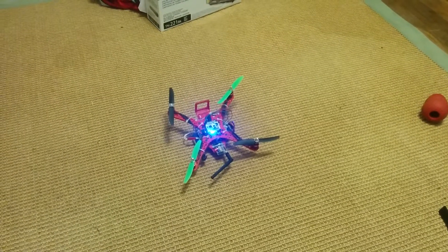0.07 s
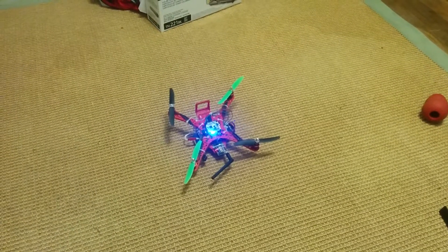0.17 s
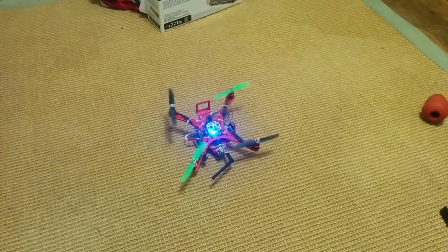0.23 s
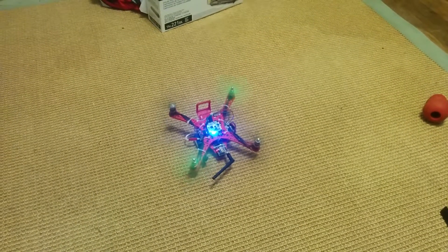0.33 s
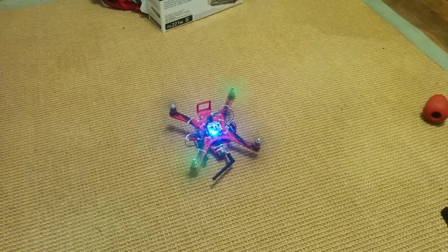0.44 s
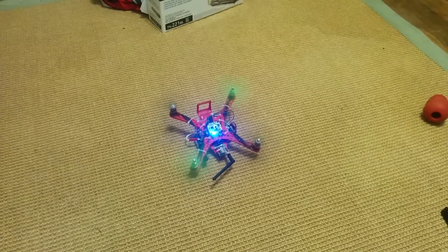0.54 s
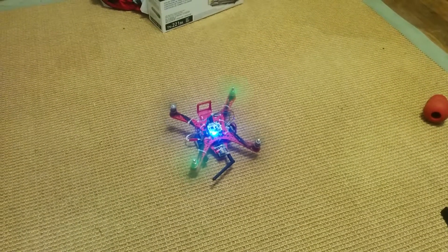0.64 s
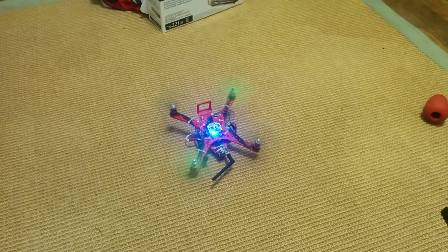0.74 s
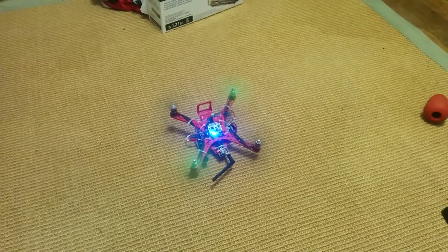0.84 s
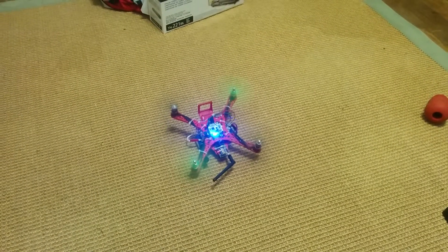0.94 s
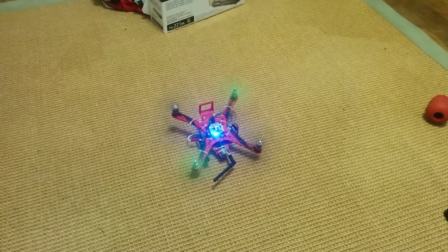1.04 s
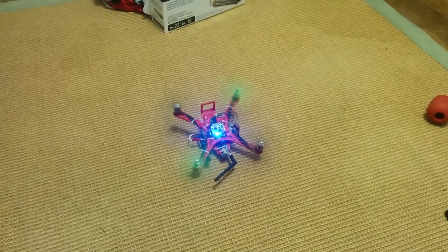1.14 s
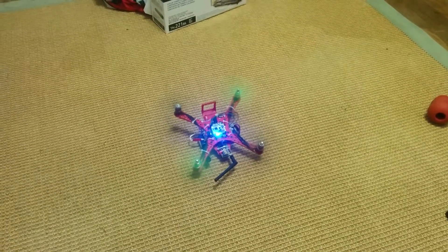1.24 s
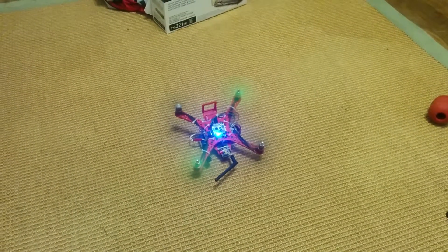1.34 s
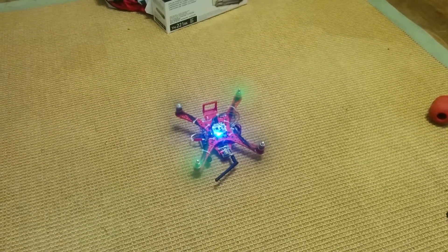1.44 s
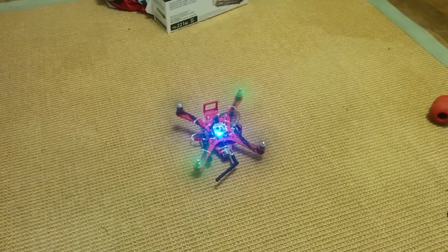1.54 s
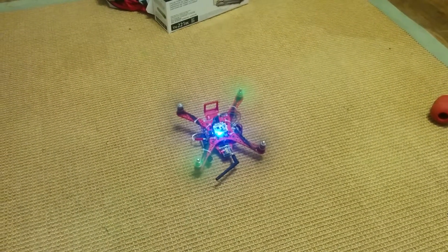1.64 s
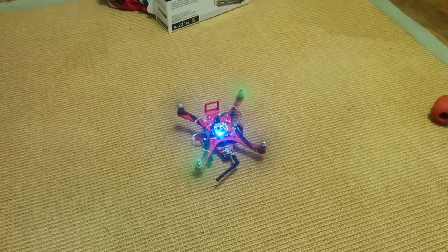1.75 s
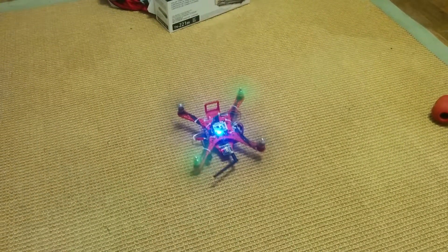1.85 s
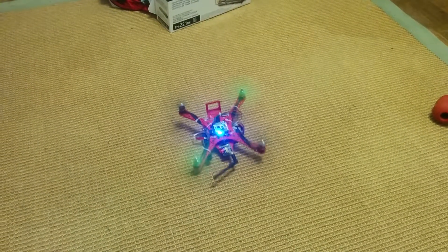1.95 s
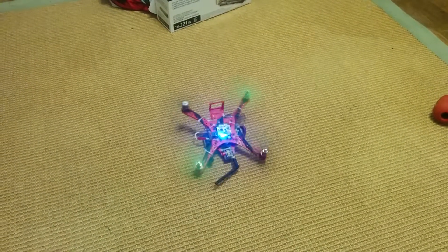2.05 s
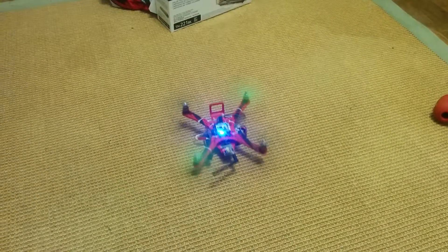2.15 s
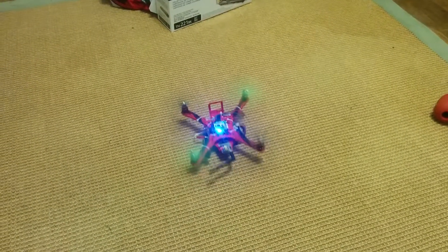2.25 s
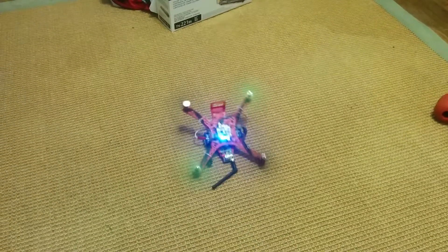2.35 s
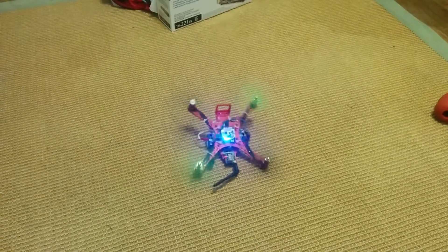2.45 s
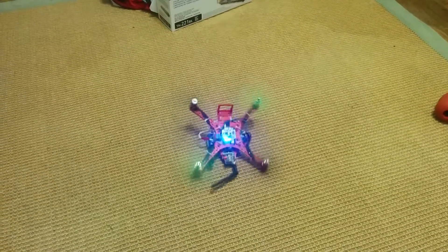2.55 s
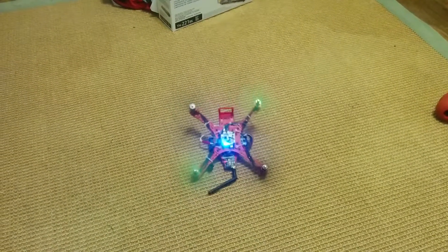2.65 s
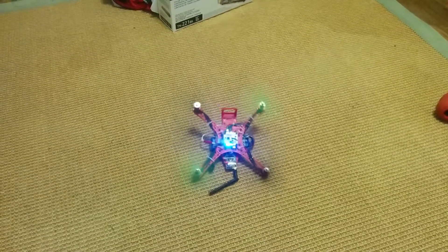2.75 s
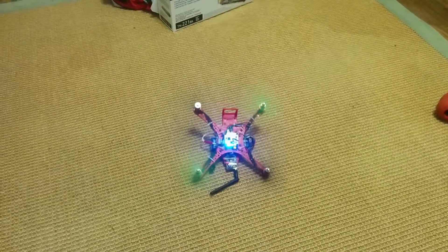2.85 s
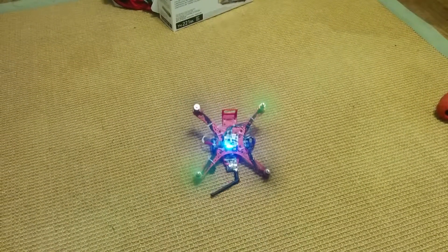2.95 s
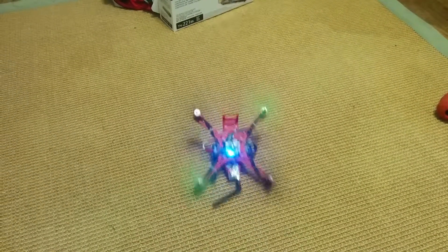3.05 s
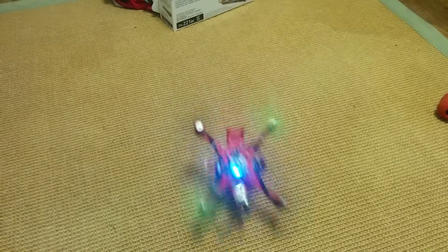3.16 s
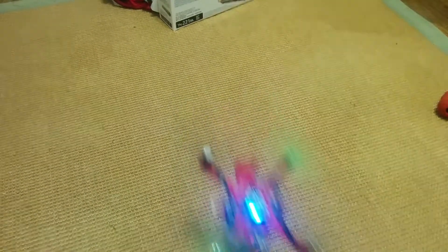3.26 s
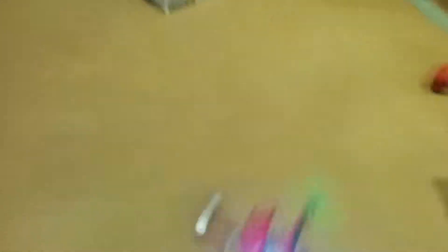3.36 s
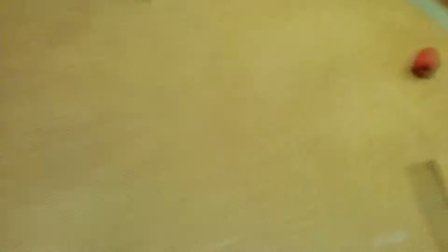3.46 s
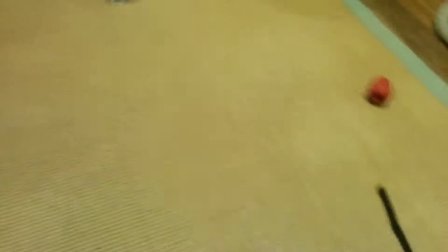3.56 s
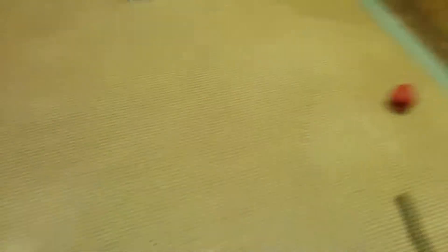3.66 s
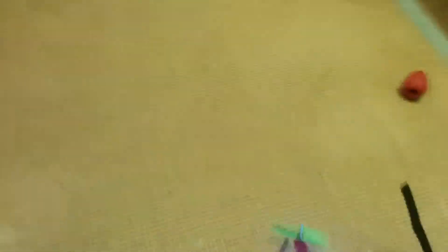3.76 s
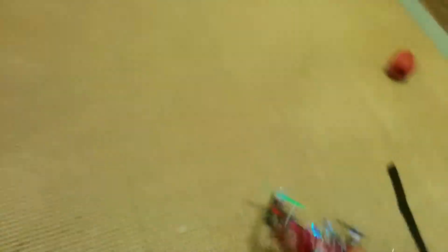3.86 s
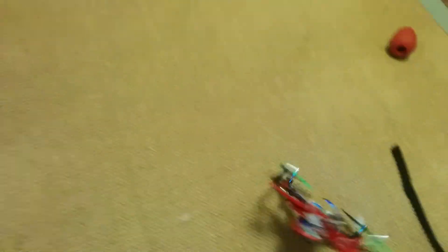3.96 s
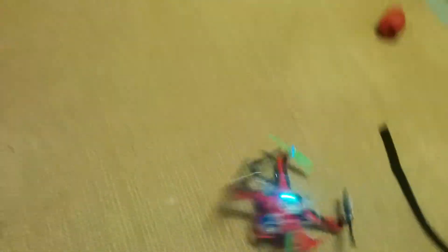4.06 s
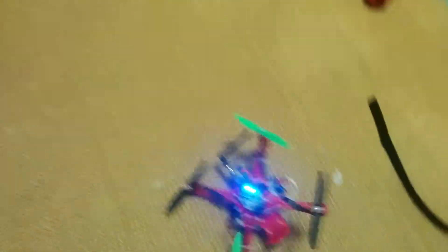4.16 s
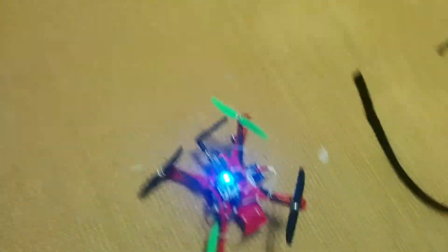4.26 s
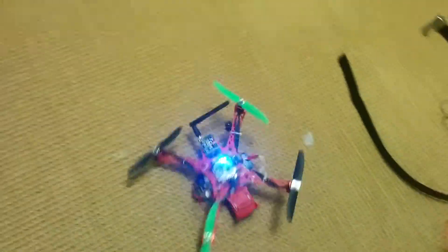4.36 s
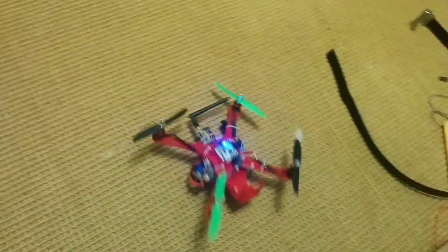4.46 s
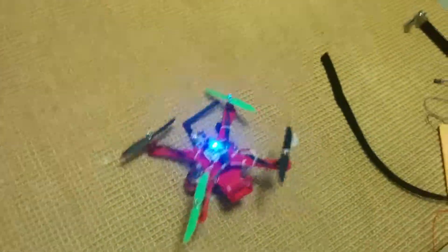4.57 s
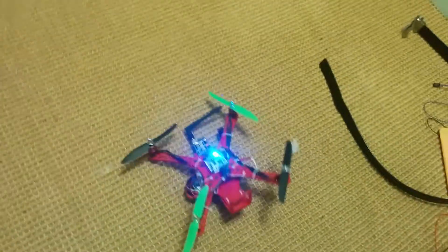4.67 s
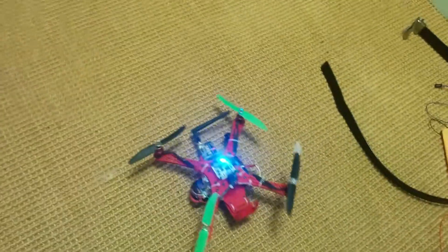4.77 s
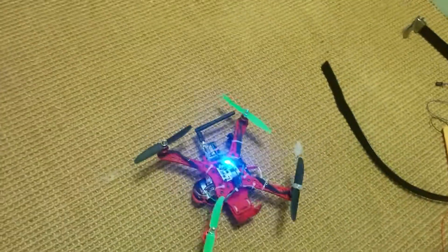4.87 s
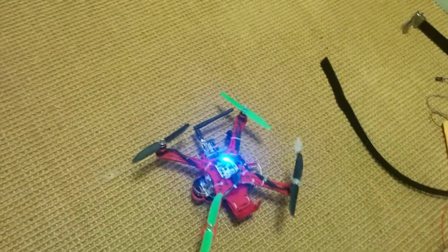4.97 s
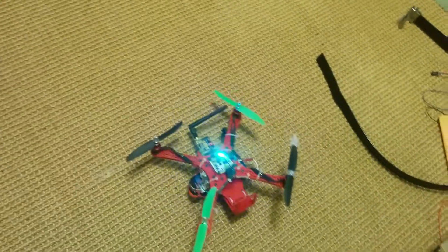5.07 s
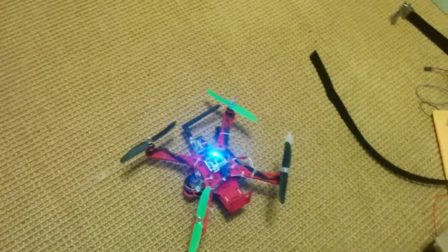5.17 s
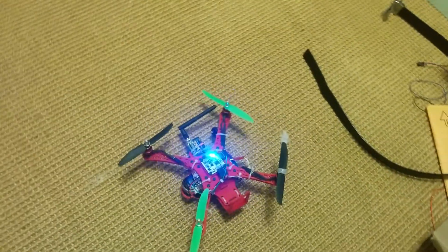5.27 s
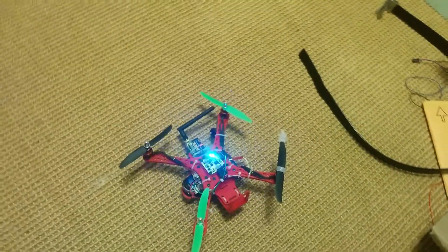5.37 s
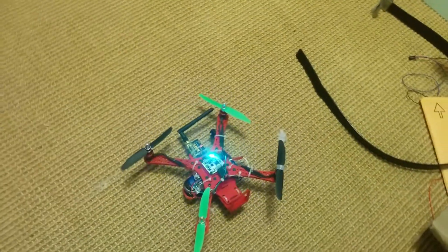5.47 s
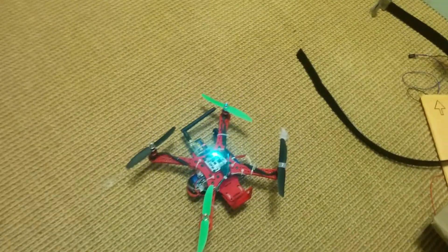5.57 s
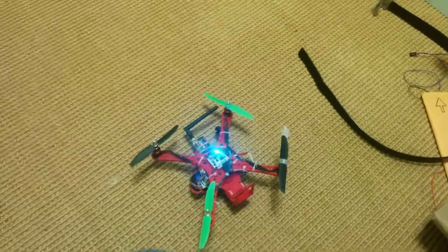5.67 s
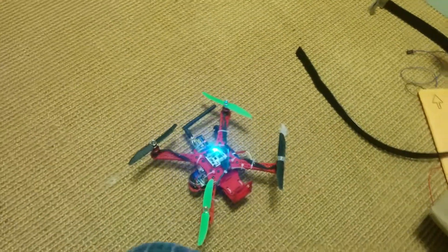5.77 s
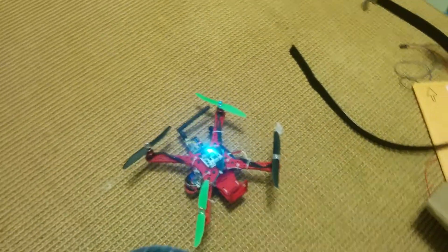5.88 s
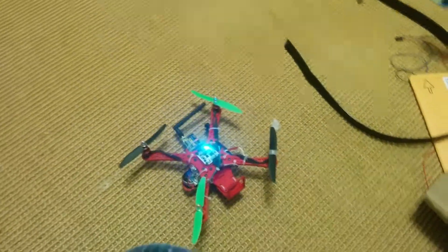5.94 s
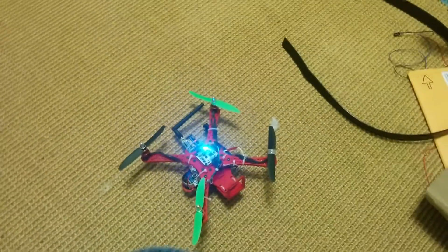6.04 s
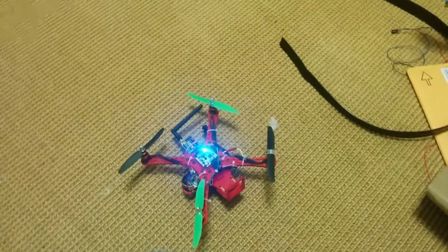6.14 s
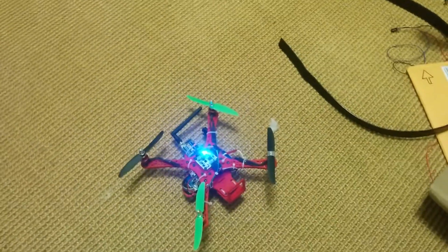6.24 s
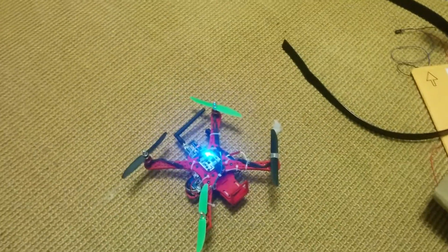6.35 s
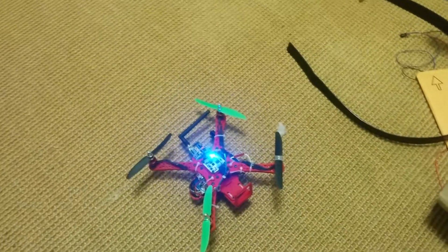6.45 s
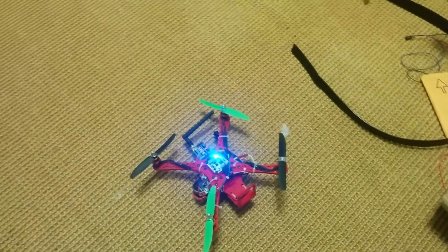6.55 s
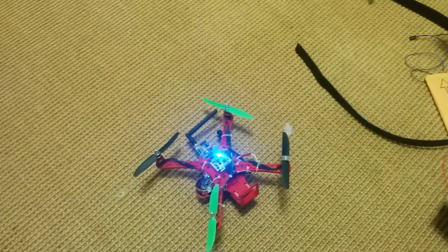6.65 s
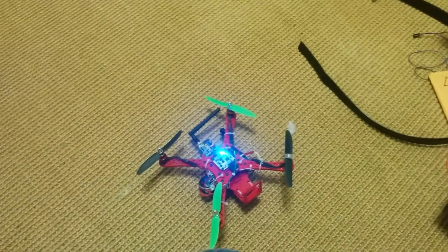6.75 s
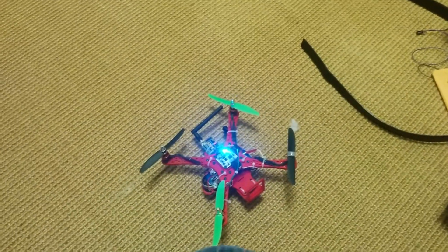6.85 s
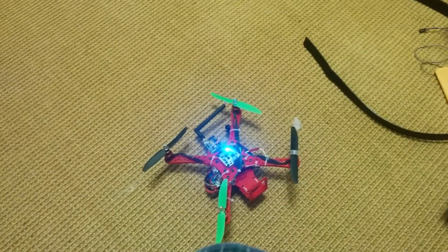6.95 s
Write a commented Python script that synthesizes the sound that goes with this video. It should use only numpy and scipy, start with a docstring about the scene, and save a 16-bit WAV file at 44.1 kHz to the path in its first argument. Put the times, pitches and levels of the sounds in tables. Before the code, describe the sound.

After a moment of very quiet room tone, drone motors kick in with a piercing beating whine. Four propellers flutter and rush, wavering in pitch, then surge loudly for an instant. Hard plastic strikes and scraping blades follow, with bumps of the frame on carpet thinning to a last soft rattle. Near-silence with faint rustling ends it. Small dull room, mono, a metre or two away.

```python
"""Quadcopter hop and crash

A small quadcopter arms on a carpet: controller tones whistle and beat while four propellers spin up.
It hops, lands on its blades, which rattle to a stop, then tumbles over and settles.
Rotors are blade-pass harmonics plus shaped noise; impacts are decaying noise bursts and modes.
A faint room hum and a late rustle remain. One microphone, a metre or two away.
"""
import sys
import numpy as np
from scipy import signal
from scipy.fft import rfft, irfft, next_fast_len
from scipy.io import wavfile
from scipy.ndimage import uniform_filter1d

SR = 44100
rng = np.random.default_rng(int(sys.argv[2]) if len(sys.argv) > 2 else 0)


def int16_out(signal):
    """Quantize to a 16-bit WAV file."""
    q = np.round(np.clip(np.atleast_2d(signal).T, -1, 1) * 32767)
    wavfile.write(sys.argv[1], SR, q.astype(np.int16))


N = 309141
T = np.arange(N) / SR

# rotor speed: (time [s], blade passes of pair A [Hz], of pair B [Hz], blade tones re wake [dB])
ROTOR_SPEED = [(.42, 32, 28, -24), (.6, 70, 85, -12), (.9, 104, 120.4, -7), (1.1, 124, 133.5, -4.5),
               (1.3, 112, 124.4, -7.5), (1.57, 134, 149, -5.5), (1.7, 112, 134, -6.5),
               (1.89, 138, 158.5, -0.5), (2.0, 126, 150, -3.5), (2.24, 147, 166, -4),
               (2.32, 126, 157, -4.5), (2.42, 160, 173, 1.5), (2.51, 117, 157, -0.5), (2.62, 122, 136, -6),
               (2.73, 151, 180, 2.5), (2.82, 123, 156, -1.5), (2.9, 102, 140, -3), (3.0, 92, 118, 3),
               (3.1, 147, 161, 3), (3.19, 196, 220, 2.5), (3.26, 225, 256, 15.5), (3.32, 247, 273, 12),
               (3.37, 205, 244, 4), (3.43, 170, 225, 4), (3.5, 132, 188, 1.5)]
# load on the propellers: (time [s], relative wake level [dB])
LOAD = [(.35, -82), (.495, -45), (.61, -46), (.75, -36.5), (1.13, -27.5), (1.26, -29), (1.5, -28),
        (1.6, -24), (1.72, -34), (1.87, -20.5), (2.02, -28), (2.08, -24.5), (2.15, -32), (2.24, -26),
        (2.32, -33.5), (2.4, -26), (2.48, -33), (2.53, -31.5), (2.64, -42), (2.72, -25.5), (2.82, -27),
        (2.91, -46), (3.02, -50), (3.14, -19.5), (3.26, -18.5), (3.37, -19.5), (3.49, -38), (3.6, -34)]
# noise re load: (time [s], vortex rush [dB], blade edges [dB], blade tips [dB])
HISS_OFFSETS = [(.5, -30, 6.5, 0.5), (.64, -10, 2, -6), (1.12, -4, 2.5, 0), (1.6, -6.5, 2, -1.5),
                (1.85, -7.5, -1, -2), (2.05, -4.5, -6.5, -4), (2.25, -5, -8, 0.5), (2.4, -5.5, -10, -3),
                (2.53, -4.5, -14, 0.5), (2.72, -3.5, -7.5, 3), (2.82, -8, -13, -3.5),
                (2.92, -3.5, -10, 3.5), (3.18, -1, 4, 3.5), (3.35, -1.5, 4, 1.5), (3.43, 0, -10, 2)]
# throttle chops: (time [s], half length [s], tip hiss and idle tone change [dB])
THROTTLE_CHOPS = [(1.694, .03, -10.5), (2.992, .022, -7)]
# blade-pass harmonics: (multiple [1], relative level [dB])
BLADE_HARMONICS = [(1, -9), (2, 2), (3, -8), (4, -1.5), (5, -8), (6, -7), (7, -9), (8, -6), (9, -11),
                   (10, -11)]
# blade-tone radiation by frame and floor: (frequency [Hz], relative level [dB])
RADIATION_SPECTRUM = [(70, -30), (150, -15), (230, -3), (300, -1.5), (380, -4), (450, 0.5), (520, 2.5),
                      (600, 1), (750, 0), (900, 2), (1050, 3), (1250, 1), (1700, -2), (2500, -8),
                      (3200, -25)]
# noise spectra of wake, vortex rush, blade edges, blade tips: (frequency [Hz], relative density [dB])
WAKE_SPECTRUM = [(24, -54.5), (40, -35), (70, -28.5), (140, -17), (190, -13.5), (260, -7.5), (340, -13.5),
                 (410, -16.5), (530, -5), (750, -3.5), (1060, 1.5), (1500, -2.5), (2100, -6), (3000, -31)]
RUSH_SPECTRUM = [(1500, -26.5), (2200, -6.5), (2800, -1), (3800, 1.5), (4300, -5.5), (5300, -26.5)]
EDGE_SPECTRUM = [(3300, -17), (4400, 0), (5300, -1), (6200, -3.5), (7300, -7.5), (9000, -27)]
TIP_SPECTRUM = [(5500, -24.5), (7300, -1.5), (8700, -0.5), (10500, -6), (12500, -10.5), (14500, -21),
                (16000, -31.5)]
# standing resonances in the wake: (frequency [Hz], width [Hz], gain [dB])
WAKE_RESONANCES = [(515, 22, -0.5), (695.8, 22, -4), (815, 22, -3), (1037, 28, 1), (1110, 25, -6),
                   (1195, 11, -3.5), (1480, 30, -2.5), (1656, 22, -0.5)]
# controller switching tone: (time [s], frequency [Hz])
SWITCHING = [(.34, 8056), (2.4, 8049), (3.15, 8049), (3.3, 8075), (3.44, 8085), (3.54, 8010)]
# whistle spells of even beats: (start [s], length [s], beats [1], relative level [dB])
WHISTLE_SPELLS = [(0.346, 0.018, 1, -47), (0.372, 0.017, 1, -36), (0.404, 0.028, 2, -39),
                  (0.428, 0.15, 2, -26.5), (.582, 0.09, 1, -23.5), (0.671, .1, 1, -23),
                  (0.774, 0.074, 1, -27), (0.854, 0.086, 1, -23), (0.942, 0.1, 1, -21.5),
                  (1.037, .075, 1, -22.5), (1.117, .145, 2, -24.5), (1.262, .12, 1, -22.5),
                  (1.389, 0.12, 1, -22.5), (1.504, 0.045, 1, -23.5), (1.548, 0.077, 1, -22),
                  (1.731, 0.1, 1, -20.5), (1.833, 0.051, 1, -20.5), (1.885, .08, 1, -36.5),
                  (1.971, 0.083, 2, -25), (2.048, 0.055, 1, -24.5), (2.127, 0.12, 1, -24.5),
                  (2.248, 0.053, 1, -26), (2.305, 0.12, 3, -21.5), (2.435, 0.096, 1, -21.5),
                  (2.609, 0.15, 2, -24.5), (2.841, 0.085, 1, -25.5), (2.944, 0.054, 1, -34.5),
                  (3.023, 0.16, 2, -21.5), (3.2, .25, 3, -32), (3.451, 0.11, 2, -25.5)]
# commutation tones: (time [s], relative level [dB])
COMMUTATION_LEVEL = [(.43, -46), (.47, -28), (.56, -49.5), (.65, -35.5), (.75, -44), (1.0, -52),
                     (1.15, -72)]
# motor run-ups: (start [s], lag [s], top commutation rate [Hz], relative level [dB])
MOTOR_RUN_UPS = [(.418, 0.3, 4140, -2), (.44, .06, 1150, -7), (.452, 0.11, 4250, -18)]
# motor squeals: (time [s], half length [s], frequency [Hz], level [dB])
MOTOR_SQUEALS = [(0.541, 0.024, 6700, -31.5), (1.162, 0.014, 5080, -22.5), (1.849, 0.017, 5234, -21),
                 (2.174, 0.015, 5410, -28), (2.23, 0.016, 4009, -29), (2.398, 0.054, 2750, -33.5),
                 (2.514, 0.02, 5430, -32.5), (2.729, 0.029, 5490, -32)]
# starting-kick sidebands: (time [s], lower sideband level [dB])
KICK_LEVEL = [(.338, -61), (.346, -68), (.353, -74), (.37, -66), (.38, -45), (.392, -62), (.41, -53),
              (.46, -44), (.55, -37.5), (.7, -40), (.9, -58), (1.0, -90)]
# arm resonances shaken at start: (time [s], half length [s], frequency [Hz], level [dB])
ARM_SHAKES = [(0.544, 0.059, 1513, -42.5), (0.557, 0.059, 1673, -48.5), (0.546, 0.071, 1017, -60)]
# blades and frame striking: (time [s], relative level [dB], tilt [dB/octave], t60 [s])
BLADE_CLACKS = [(3.459, -18.5, -6.5, 0.04), (3.528, -29.5, 8.5, 0.17), (3.609, -4.5, 3, 0.042),
                (3.614, -14.5, -1.5, 0.14), (3.626, -11.5, 5, 0.058), (3.651, -14.5, 5.5, 0.023),
                (3.668, -15, 1, 0.021), (3.689, -30, 5, 0.028), (3.802, -36, 10.5, 0.018),
                (3.827, -42, -9, .03), (3.855, -59, 20, .02), (3.92, -32, -5, 0.092),
                (3.950, -31.5, 13, 0.023), (3.981, -39, -11, .025), (4.037, -25.5, -8, 0.025),
                (4.062, -42.5, -13.5, 0.019), (4.077, -37, -10, .025), (4.156, -35, -2, 0.042),
                (4.194, -44, -7.5, .067), (4.257, -33.5, 1.5, 0.045), (4.261, -28, 3.5, 0.023),
                (4.196, -59, 3, .04), (4.323, -48.5, 0, .05), (4.349, -63, 6, .025), (4.686, -69, 2, 0.032),
                (5.416, -61, -11.5, 0.055), (5.774, -70, -9.5, .06)]
# blades dragging over carpet:
# (time [s], length [s], relative level [dB], tilt [dB/octave], slowing t60 [s], rasp near 2 kHz [dB])
BLADE_SCRAPES = [(3.607, 0.077, -26, -2, 0.24, 0), (3.636, 0.094, -25, 3, 0.32, -2),
                 (3.802, 0.092, -38, 0.5, 0.64, -11), (3.918, 0.049, -33, -1.5, 0.37, -10.5),
                 (3.963, 0.13, -48.5, 7, 0.32, -7), (4.039, 0.047, -40.5, 5.5, 0.25, 5),
                 (4.159, 0.054, -53.5, -5, 0.63, -1), (4.252, .08, -57, 3, 0.23, 0.5),
                 (4.545, .04, -54.5, -12.5, .095, 1)]
# body on floor: (time [s], relative level [dB], relative arm ring [dB], body pitch [Hz], body t60 [s])
BODY_THUMPS = [(3.631, -15.5, -23, 177, 0.23), (3.651, -15, -15, 192, 0.15), (3.804, -39, 5, 150, 0.21),
               (3.861, -5, -10, 231, 0.071), (3.889, -14.5, -9, 214, 0.13), (3.916, -2, -2.5, 260, .085),
               (3.942, -8, -8.5, 222.5, 0.14), (3.976, -11.5, -2, 228.5, 0.15),
               (4.035, -15, -8, 266, 0.086), (4.079, -23, -20, 303, .12), (4.159, -27, -19, 220, 0.04),
               (4.185, -26, -10, 257, 0.12), (4.252, -19.5, -7, 227, 0.18),
               (4.324, -17.5, -21, 196.5, 0.12), (4.398, -35, -27, 170, 0.092), (4.56, -19, 1.5, 223, .07),
               (4.584, -24.5, 6.5, 215, 0.083), (4.62, -31, -13, 205, .075), (4.731, -35, -29, 196, .07),
               (5.87, -43, -25.5, 220, .095)]
# single parts ringing: (time [s], relative level [dB], frequency [Hz], t60 [s])
PART_RINGS = [(3.461, -9.5, 542.4, 0.039), (3.46, -16, 3040, 0.033), (3.46, -13, 4300, 0.037),
              (3.525, -7, 1017, 0.06), (3.529, -29, 1620, 0.33), (3.636, -17.5, 2780, 0.19),
              (3.636, -12.5, 3940, 0.16), (3.895, -28.5, 3950, 0.064), (3.95, -14, 9160, 0.19),
              (4.038, -26.5, 2290, 0.15), (4.038, -16, 3680, 0.028), (4.041, -33, 1560, 0.16),
              (4.157, -26, 3700, 0.037), (4.197, -9.5, 910, 0.013), (4.227, -32, 3360, 0.021),
              (4.259, -18, 4520, 0.043), (4.258, -13, 2870, 0.021), (4.26, -40, 643, 0.31),
              (4.323, -31, 4140, 0.047), (4.565, -33, 676, 0.096), (4.638, -64, 1550, 0.17),
              (4.717, -53.5, 1050, 0.052), (4.763, -52, 4590, 0.044), (5.345, -60, 3450, 0.16),
              (5.774, -62.5, 2050, .05)]
# plastic contact bands: (low [Hz], high [Hz], level in a clack [dB], level in a scrape [dB])
PLASTIC_BANDS = [(499, 1500, -7.5, -2), (1680, 3000, -5, 2), (3330, 6100, 6, -7.5), (6890, 11100, 1.5, 4),
                 (12000, 17000, -22.5, -20.5)]
# body modes: (ratio to body pitch [1], relative level [dB], share of body t60 [1])
BODY_MODES = [(.32, -27, 1.2), (.457, -9.5, 1.7), (.71, -14.5, 1.8), (.876, -4.5, 1.3), (1, 2.5, 1),
              (1.23, -4, 1), (1.56, -12.5, .9)]
# arm modes: (frequency [Hz], relative level [dB], t60 [s])
ARM_MODES = [(448, 1, 0.055), (536, -2.5, .1), (575, 0.5, 0.1), (633, -3, 0.11)]
# frame ticks: (time [s], level [dB])
FRAME_TICKS = [(4.551, -39.5), (4.562, -33), (4.568, -36), (4.576, -34), (4.585, -36.5), (4.594, -39.5),
               (4.608, -52.5)]
# frame tick spectrum: (frequency [Hz], relative density [dB])
FRAME_SPECTRUM = [(400, -14.5), (700, 1.5), (1200, -5), (1700, -3.5), (2200, -9.5), (2750, -2.5),
                  (3300, -6.5), (3950, 6.5), (4600, -11.5), (5700, -13), (7000, -27.5), (10000, -47)]
# rubbed frame resonances: (frequency [Hz], relative level [dB])
RUBBED_MODES = [(980, -5), (1550, -5), (2050, -6), (2900, -9)]
# handling rustle bands: (low [Hz], high [Hz], relative level [dB])
RUSTLE_BANDS = [(189, 286, -0.5), (600, 1170, -7), (1698, 2700, -15.5)]
# room hum spectrum: (frequency [Hz], relative density [dB])
HUM_SPECTRUM = [(18, -52), (30, -29), (60, -22), (85, -19), (102, -8), (130, -16.5), (170, -17), (215, -2),
                (290, -7.5), (360, -16.5), (420, -17), (500, -15.5), (860, -16), (1270, -23.5), (1600, -28),
                (2500, -28), (3300, -29), (15000, -48)]
# room hum: (time [s], relative level [dB])
HUM_ENVELOPE = [(0, -64), (.2, -69), (5.0, -72), (5.25, -68), (6.0, -67.5), (7.0, -65)]
# room hum tones: (frequency [Hz], level re hum [dB])
HUM_TONES = [(214, -10), (262, -13.5), (306, -14), (856, -16), (2450, -27.5)]

TIP_DB, TIP_SLOPE = -11, 0.53  # tip hiss at 0 dB load [dB]; its slope [dB per dB of load]
TILT_PIVOT_HZ, SCRAPE_RISE_S, CONTACT_S = 2950, 0.012, 0.0031
SCRAPE_STOP_T60_S = .2  # once the blade comes free
TOP_HZ = 16000


def rotors(wake_gain_db=-1, gust_db=1):
    """Low wake with blade tones, vortex rush, and hiss of blade edges and tips."""
    pair_a_hz, pair_b_hz, tone_db = curves(ROTOR_SPEED)
    load_db, = curves(LOAD)
    rush_db, edge_db, tip_db = curves(HISS_OFFSETS)
    tip_db = tip_db + TIP_DB + TIP_SLOPE * load_db + chop_db()
    blades, air = blade_tones(pair_a_hz, pair_b_hz)
    # small blades radiate little bass; harmonics swell in favoured ranges
    tones = colour(blades, RADIATION_SPECTRUM) * undb(tone_db)
    wake = colour(air, WAKE_SPECTRUM)
    resonant = sum(undb(db) * band(wake, hz - width_hz / 2, hz + width_hz / 2, order=1)
                   for hz, width_hz, db in WAKE_RESONANCES)
    wake = unit(wake + resonant)
    wake = (wake + tones) / np.sqrt(1 + undb(tone_db) ** 2)
    wake = wake * undb(load_db + wake_gain_db + np.interp(T, [.52, .63], [-10, 0]))
    # slow tips at start hiss less at the very top
    tips = colour(noise(), TIP_SPECTRUM)
    dull_tips = unit(low_pass(tips, 11000, order=3))
    bright = np.interp(T, [.45, 1], [0, 1])
    tips = bright * tips + (1 - bright) * dull_tips
    rush = colour(air, RUSH_SPECTRUM) * undb(load_db + rush_db + gust_db * walk(45))
    edges = colour(noise(), EDGE_SPECTRUM) * undb(load_db + edge_db + gust_db * walk(45))
    return patchy(wake + rush + edges) + tips * undb(tip_db)


def blade_tones(pair_a_hz, pair_b_hz, spread=.022, wander=.024, unsteady=.75, chop=.6,
                rate_hz=12, twin_db=-5):
    """Harmonics, slaps and chopped air of four propellers; the pairs part in speed as the craft tilts."""
    flutter, slap = .006, .65
    loose = np.clip(200 / pair_a_hz, 0, 1) ** 2  # motors wander less at high throttle
    blades, air = 0, 0
    for speed_hz in (pair_a_hz, pair_b_hz):
        # turbulence shakes each harmonic
        sizes = [undb(db) * (1 + unsteady * walk(32)) for _, db in BLADE_HARMONICS]
        for offset, share_db in [(0, 0), (spread, twin_db)]:
            # the flight controller trims each motor: random speed wander
            drift = loose * wander * walk(rate_hz) + flutter * walk(110)
            turn = angle(speed_hz * (1 + offset + drift))
            for (k, _), size in zip(BLADE_HARMONICS, sizes):
                harmonic = np.cos(round(k) * turn + rng.uniform(0, 2 * np.pi))
                blades = blades + undb(share_db) * size * harmonic
            chopped = noise() * (1 + chop * np.cos(turn))
            air = air + undb(share_db) * (chopped + slap * slaps(turn))
    return reflected(blades, wet=.42), reflected(air, wet=0.21)


def slaps(turn, scatter_db=3):
    """One pressure pulse of uneven strength per blade passing the arm; rms 1."""
    cycles = turn / (2 * np.pi)
    at = np.interp(np.arange(1, int(cycles[-1])), cycles, np.arange(N))
    size = undb(scatter_db * noise(len(at)))
    out, i = np.zeros(N + 1), at.astype(int)
    # split each pulse over two samples
    out[i] += size * (1 - at + i)
    out[i + 1] += size * (at - i)
    return unit(out[:N] - out.mean())


def reflected(x, wet, t60_s=.12, count=14):
    """Early echoes from floor and walls, so gliding partials swell and break up."""
    delays_s = rng.uniform(.003, .035, count)
    gains = fade(delays_s, t60_s) * rng.choice([-1, 1], count)
    gains = wet * gains / np.linalg.norm(gains)
    return x + sum(g * np.roll(x, int(d * SR)) for d, g in zip(delays_s, gains))


def patchy(x, lo_hz=1400, hi_hz=6200, depth=0.23, rate_hz=26, count=11):
    """Turbulence lifts and sinks narrow bands of the roar independently."""
    edges_hz = np.geomspace(lo_hz, hi_hz, count + 1)
    return x + sum(depth * walk(rate_hz) * band(x, lo, hi, order=1)
                   for lo, hi in zip(edges_hz, edges_hz[1:]))


def chop_db():
    """Ducking of tip hiss and idle tone while the throttle is chopped [dB]."""
    return sum(db * bell(T - s, half_s) for s, half_s, db in THROTTLE_CHOPS)


def whistle(gain_db=3.5, flutter=.13, skirt_db=-17, roundness=0.7, idle_db=-37, idle_beat_hz=14):
    """Switching tones beat in spells when in step; a weak wavering tone runs beneath."""
    swell = np.zeros(N)
    for s, length_s, beats, level_db in WHISTLE_SPELLS:
        lobe = np.sin(np.pi * round(beats) * np.linspace(0, 1, int(length_s * SR)))
        add(swell, s, np.sign(lobe) * np.abs(lobe) ** roundness * undb(level_db + gain_db))
    phase = angle(curves(SWITCHING)[0])
    idle = undb(idle_db + chop_db()) * walk(idle_beat_hz)
    idle = idle * np.interp(T, [.34, .42, .5], [.08, .2, 1])
    tone = 2 * (swell * np.sin(phase) + idle * np.cos(phase)) * (1 + flutter * walk(330))
    # commutation roughens the tone
    skirt = unit(band(noise(), 7880, 8230)) * uniform_filter1d(np.abs(swell), SR // 10) * undb(skirt_db)
    return tone + skirt


def motors(lower_side_db=-7, jitter=.025, unsteady=.5):
    """Commutation sidebands of the switching tone, and brief squeals."""
    db, = curves(COMMUTATION_LEVEL)
    carrier = angle(curves(SWITCHING)[0])
    out = np.zeros(N)
    for k, (s, lag_s, top_hz, motor_db) in enumerate(MOTOR_RUN_UPS):
        rate_hz = top_hz * (1 - np.exp(-np.maximum(T - s, 0) / lag_s))
        step = angle(rate_hz * (1 + jitter * walk(600)))
        # only the first motor sings on once it has caught
        hold = np.interp(T, [.53, .57], [1, 0]) if k else 1
        level = undb(db + motor_db) * (1 + unsteady * walk(90)) * hold
        out += (np.sin(carrier + step) + undb(lower_side_db) * np.sin(carrier - step)) * level
    t = np.arange(SR // 4) / SR - 1 / 8
    for s, half_s, hz, level_db in MOTOR_SQUEALS:
        squeal = unit(band(noise(len(t)), hz - 290, hz + 290))
        add(out, s + t[0], squeal * bell(t, half_s) * undb(level_db))
    return out


def starting_buzz(offset_hz=2820, width_hz=480, upper_db=-7):
    """Rough sidebands of the switching tone while controllers kick the motors into turning."""
    carrier_hz = SWITCHING[0][1]
    lower, upper = (unit(band(noise(), hz - width_hz / 2, hz + width_hz / 2))
                    for hz in (carrier_hz - offset_hz, carrier_hz + offset_hz))
    return (lower + undb(upper_db) * upper) * undb(curves(KICK_LEVEL)[0])


def starting_arms(width_hz=110):
    """Arms shaken at their resonances as the starting motors pass through them."""
    return sum(unit(band(noise(), hz - width_hz / 2, hz + width_hz / 2)) * undb(db) * bell(T - s, half_s)
               for s, half_s, hz, db in ARM_SHAKES)


def bearings(db=-42, half_s=0.15, peak_s=0.68):
    """Even whirr, swelling as the motors start, before air noise covers it."""
    whirr = unit(band(noise(), 3100, 6700)) * undb(db)
    return whirr * bell(T - peak_s, half_s) * np.interp(T, [.37, .5], [0, 1])


def dive(hz=339, tone_db=-38, wash_db=-45, lo_hz=95, hi_hz=330):
    """As the craft drops, one propeller drones on and its downwash buffets the floor."""
    tone_hz = hz * (1 + .015 * walk(50)) * np.interp(T, [3.56, 3.63], [1, .88])
    tone = np.sqrt(2) * np.sin(angle(tone_hz))
    wash = unit(band(noise(), lo_hz, hi_hz))
    gate = np.interp(T, [3.42, 3.48, 3.6, 3.64], [0, 1, 1, 0])
    return (tone * undb(tone_db) + wash * undb(wash_db)) * gate


def tumble(clack_db=-8, scrape_db=-3.5, thump_db=-9.5, arms_db=-7, ring_db=0, shudder_db=-10,
           shudder_t60_s=0.084, rumble_db=-17, rumble_t60_s=.22, width_hz=200):
    """Blades strike and drag, the body bumps the carpet, small parts ring."""
    out, t = np.zeros(N), np.arange(SR // 3) / SR
    struck = [(lo, hi, db) for lo, hi, db, _ in PLASTIC_BANDS]
    for s, db, tilt_db, t60_s in BLADE_CLACKS:
        clack = plastic(struck, db, tilt_db, len(t), grain_db=0.5)
        add(out, s, clack * fade(t, t60_s) * undb(clack_db))
    for s, length_s, db, tilt_db, t60_s, rasp_db in BLADE_SCRAPES:
        # rasp acts on the second band
        dragged = [(lo, hi, level_db + rasp_db * (k == 1))
                   for k, (lo, hi, _, level_db) in enumerate(PLASTIC_BANDS)]
        shape = np.minimum(t / SCRAPE_RISE_S, 1) * fade(np.maximum(t - SCRAPE_RISE_S, 0), t60_s)
        shape = shape * fade(np.maximum(t - length_s, 0), SCRAPE_STOP_T60_S)
        scrape = plastic(dragged, db, tilt_db, len(t), grain_db=2.5)
        add(out, s, scrape * shape * undb(scrape_db))
    for s, db, middle_db, hz, t60_s in BODY_THUMPS:
        # loose battery and arms shudder on after each bump; the floor rumbles
        shudder = unit(band(noise(len(t)), 160, 389, order=3)) * fade(t, shudder_t60_s) * undb(shudder_db)
        rumble = unit(band(noise(len(t)), 75, 150)) * fade(t, rumble_t60_s) * undb(rumble_db)
        modes = [(hz * ratio, mode_db, t60_s * share) for ratio, mode_db, share in BODY_MODES]
        arms = undb(middle_db + arms_db) * ring(ARM_MODES, t)
        body = (ring(modes, t) + arms + shudder + rumble) * (1 - np.exp(-t / CONTACT_S))
        add(out, s + 0.0025, band(body, 49, 3000, order=1) * undb(db + thump_db))
    for s, db, hz, t60_s in PART_RINGS:
        # a loose part buzzes against the frame: rough ring
        buzz = unit(band(noise(len(t)), hz - width_hz / 2, hz + width_hz / 2))
        add(out, s, buzz / 2 * np.minimum(t / 0.0015, 1) * fade(t, t60_s) * undb(db + ring_db))
    return out


def plastic(ranges, level_db, tilt_db, size, grain_db, patchy_db=5):
    """Gritty contact noise in bands, tilted by hardness; each contact spot has its own peaks and dips."""
    hz = np.geomspace(200, 20000, 70)
    out = 0
    for lo, hi, db in ranges:
        grit = colour(noise(size), np.column_stack([hz, patchy_db * noise(len(hz))]))
        octaves = np.log2(np.sqrt(lo * hi) / TILT_PIVOT_HZ)
        out = out + undb(level_db + db + tilt_db * octaves) * unit(band(grit, lo, hi, order=3))
    # slips and catches, a new value every 64 samples
    points = size // 64 + 2
    grain = np.interp(np.arange(size) / 64, np.arange(points), noise(points))
    return out * unit(undb(grain_db * grain))


def ring(modes, t, scatter=.02):
    """Decaying modes, detuned a little by each way of landing."""
    return sum(undb(db) * np.sin(2 * np.pi * hz * (1 + scatter * rng.standard_normal()) * t) * fade(t, t60_s)
               for hz, db, t60_s in modes)


def rattle(db=0, t60_s=0.05):
    """The frame drops onto its feet and chatters: dry plastic ticks milliseconds apart."""
    out, t = np.zeros(N), np.arange(SR // 8) / SR
    for s, tick_db in FRAME_TICKS:
        add(out, s, noise(len(t)) * fade(t, t60_s) * undb(tick_db + db))
    return colour(out, FRAME_SPECTRUM) * np.std(out)


def slide(db=-71, peak_s=4.44, half_s=0.13, width_hz=130, grain_db=4):
    """The frame brushes the carpet faintly as it tips over, humming at its resonances."""
    rubbed = sum(undb(mode_db) * unit(band(noise(), hz - width_hz / 2, hz + width_hz / 2, order=1))
                 for hz, mode_db in RUBBED_MODES)
    return unit(rubbed) * undb(db + grain_db * walk(160)) * bell(T - peak_s, half_s)


def room(x, wet_db=-14, t60_s=0.109):
    """Carpeted room: short, dull noise tail."""
    t = np.arange(SR // 2) / SR
    tail = band(noise(len(t)), 137, 10000, order=1) * fade(t, t60_s) * (t > .006)
    return x + undb(wet_db) * signal.fftconvolve(x, tail / np.linalg.norm(tail))[:N]


def rustle(db=-74, grain_db=3, swell_db=3):
    """Faint, uneven handling rustle, growing from 5.05 s."""
    out = sum(unit(band(noise(), lo, hi)) * undb(level_db + swell_db * walk(5.3))
              for lo, hi, level_db in RUSTLE_BANDS)
    return out * undb(db + grain_db * walk(140)) * np.interp(T, [5.05, 5.3, 7], [0, .5, 1])


def hum(waver_db=1, lumps_db=4.5, line_waver=0.77, hiss_db=-86):
    """Dull room noise, lumpy in the bass, with wavering tones over a steady faint hiss."""
    db, = curves(HUM_ENVELOPE)
    lines = sum(undb(g) * np.sin(angle(hz * (1 + 0.004 * walk(6.8)))) * (1 + line_waver * walk(22))
                for hz, g in HUM_TONES)
    air = colour(noise(), HUM_SPECTRUM)
    bass = low_pass(air, 420, order=2)
    upper = (air - bass) * undb(-5.0 + waver_db * walk(4.4))
    air = bass * undb(-2.5 + lumps_db * walk(36)) + upper
    return (air + lines) * undb(db) + noise() * undb(hiss_db)


def undb(db):
    """Decibels to gain."""
    return 10 ** (np.asarray(db) / 20)


def unit(x):
    """Scale to rms 1."""
    return x / np.sqrt(np.mean(x ** 2))


def curves(table):
    """Table columns, linearly interpolated over time."""
    s, *columns = np.transpose(table)
    return [np.interp(T, s, c) for c in columns]


def colour(x, spectrum):
    """Shape by (frequency [Hz], level [dB]) points; rms 1."""
    hz, db = np.transpose(spectrum)
    size = next_fast_len(len(x))
    f = np.maximum(np.fft.rfftfreq(size, 1 / SR), 1)
    gain = undb(np.interp(np.log(f), np.log(hz), db, left=-90, right=-90))
    return unit(irfft(rfft(x, size) * gain, size)[:len(x)])


def band(x, lo_hz, hi_hz, order=2):
    """Causal band-pass."""
    sos = signal.butter(order, [lo_hz, min(hi_hz, SR / 2 - 1)], "band", fs=SR, output="sos")
    return signal.sosfilt(sos, x)


def low_pass(x, hz, order):
    """Zero-phase low-pass."""
    return signal.sosfiltfilt(signal.butter(order, hz, fs=SR, output="sos"), x)


def noise(size=N):
    """White noise."""
    return rng.standard_normal(size)


def walk(rate_hz):
    """Random points joined by lines, rate_hz per second; rms 1."""
    points = int(T[-1] * rate_hz) + 2
    return unit(np.interp(T * rate_hz, np.arange(points), noise(points)))


def angle(hz):
    """Running phase of a frequency curve [rad]."""
    return 2 * np.pi * np.cumsum(hz) / SR


def fade(t, t60_s):
    """Exponential decay; t60 at least 2 ms."""
    return np.exp(-np.log(1000) * t / max(t60_s, .002))


def bell(t, half_s):
    """Gaussian swell around time zero."""
    return np.exp(-.5 * (t / half_s) ** 2)


def add(out, s, x):
    """Mix x in at time s."""
    i = int(s * SR)
    out[i:i + len(x)] += x[:N - i]


def scene():
    """One microphone on two equal channels; the drive runs from arming until the blades hit the floor."""
    running = np.interp(T, [.338, .341, 3.6, 3.66], [0, 1, 1, 0])
    drive = rotors() + motors() + starting_buzz() + starting_arms() + dive() + bearings() + whistle()
    crash = room(tumble() + rattle() + slide())
    mono = drive * running + crash + hum() + rustle()
    return np.array([mono, mono])


def record(dry, ceiling=0.5):
    """Round the loudest peaks by tanh, then cut steeply above TOP_HZ."""
    rounded = ceiling * np.tanh(dry / ceiling)
    return signal.sosfilt(signal.ellip(10, .2, 80, TOP_HZ, fs=SR, output="sos"), rounded)


dry = scene()
out = record(dry)
int16_out(out)
```